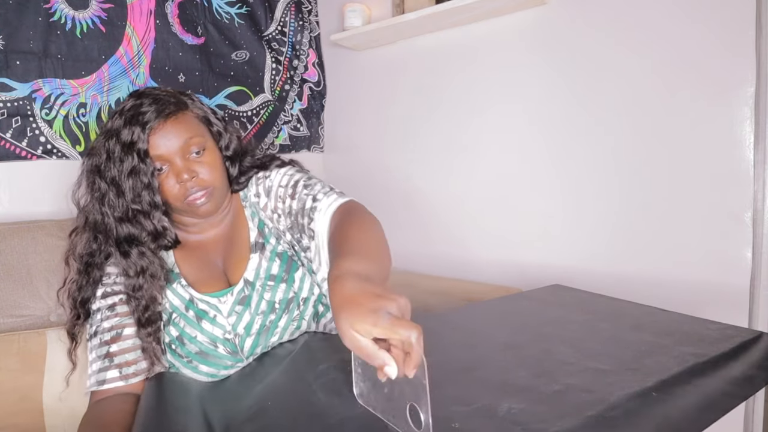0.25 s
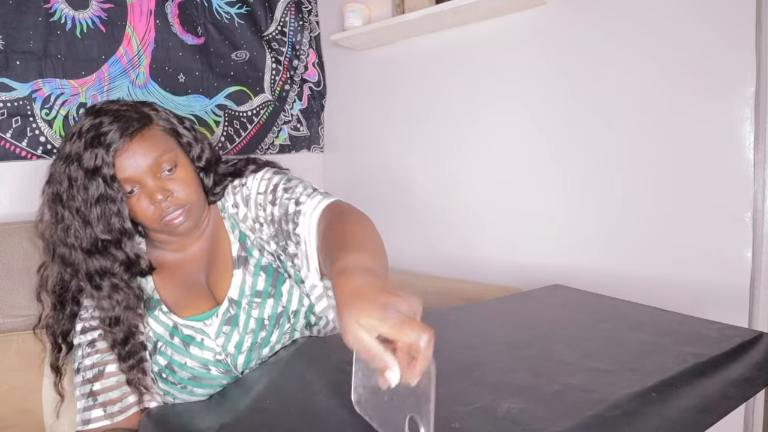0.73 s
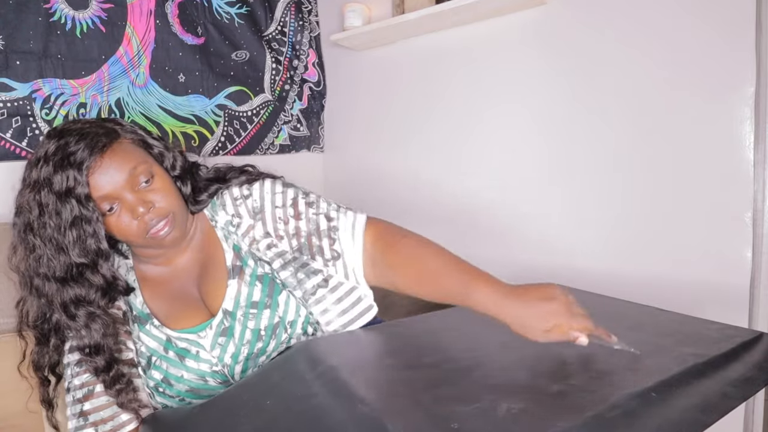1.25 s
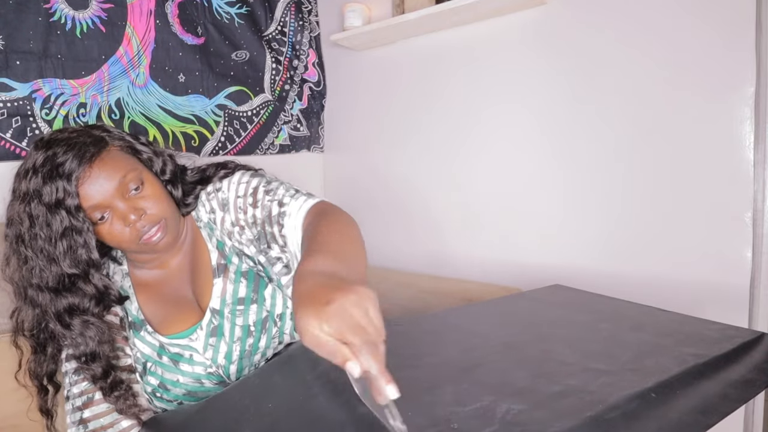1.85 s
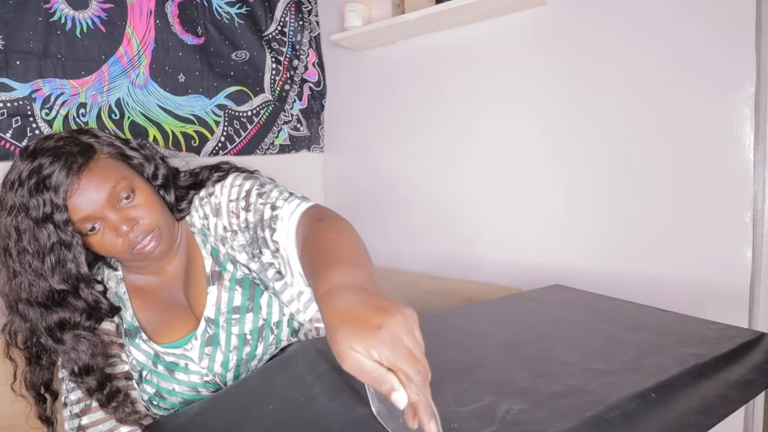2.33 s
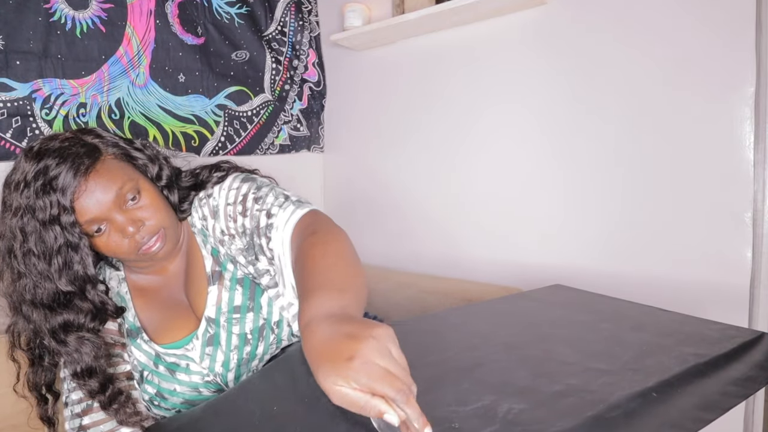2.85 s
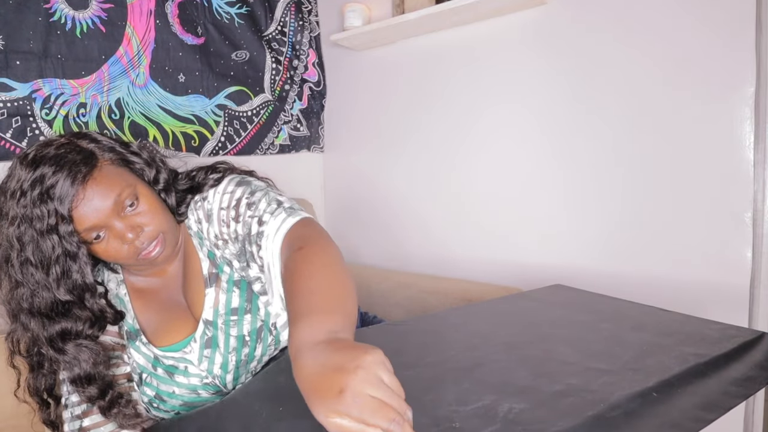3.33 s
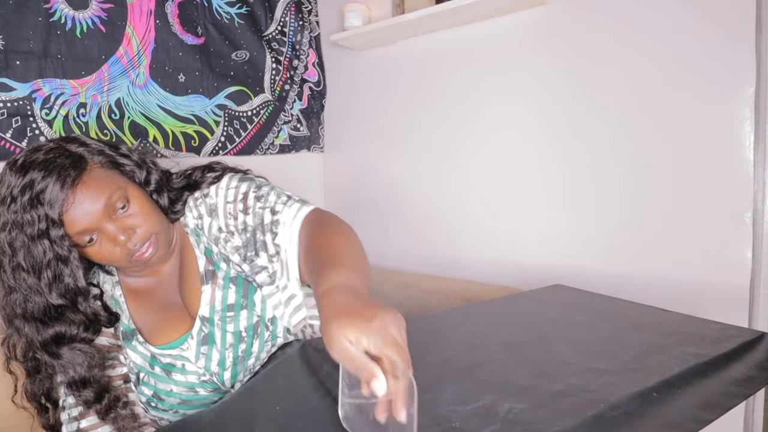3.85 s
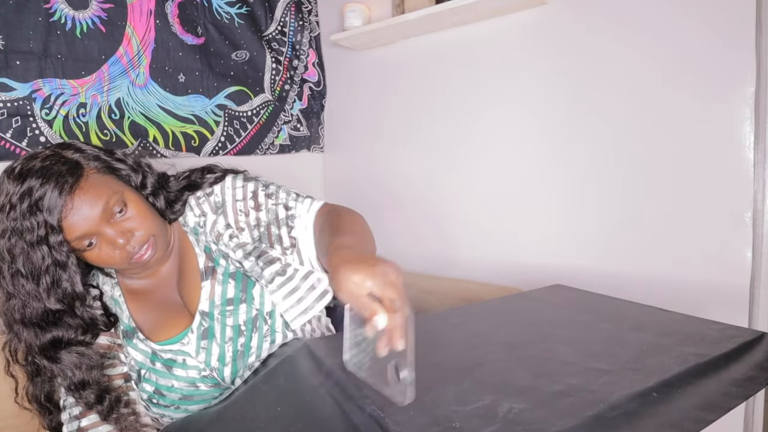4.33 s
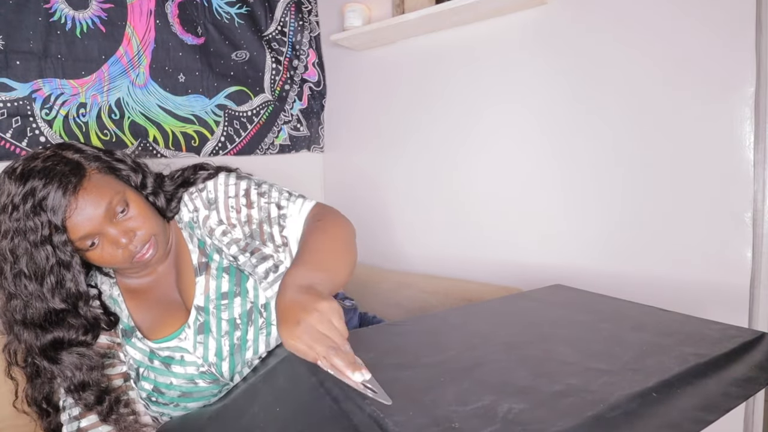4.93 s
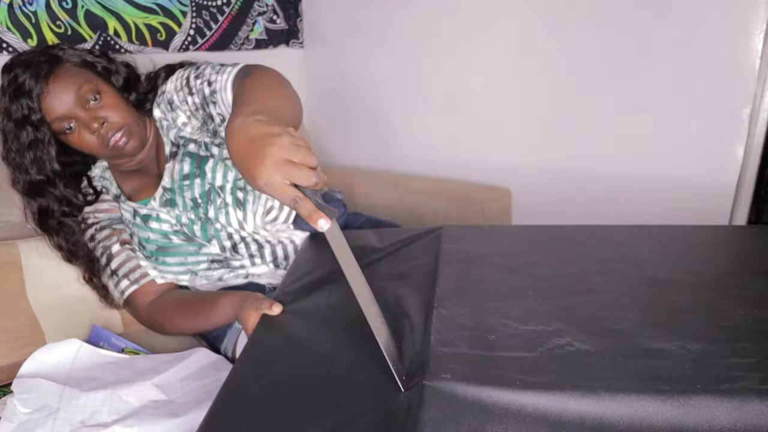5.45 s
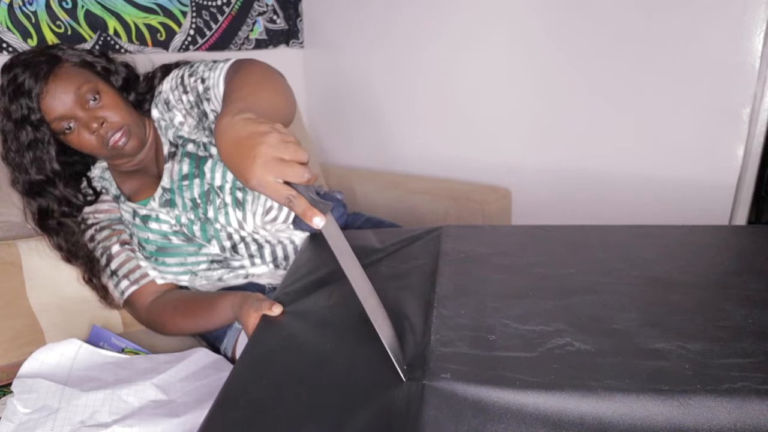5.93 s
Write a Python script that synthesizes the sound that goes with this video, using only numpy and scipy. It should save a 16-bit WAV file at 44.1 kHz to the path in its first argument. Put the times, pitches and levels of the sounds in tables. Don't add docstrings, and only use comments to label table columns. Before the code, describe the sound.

In a small room, a plastic card ticks and rubs lightly over vinyl on a hollow desk. A hard slap starts a long bright scrape, ended by another knock. Several knocks, dull rubs and a quick airy flick follow, then a shorter scrape. An abrupt cut leaves faint rubs and a small closing tick. Close stereo microphone, low room rumble.

```python
import sys
import numpy as np
from scipy import signal
from scipy.fft import rfft, irfft, next_fast_len
from scipy.io import wavfile
from scipy.ndimage import uniform_filter1d

SR = 44100
rng = np.random.default_rng(int(sys.argv[2]) if len(sys.argv) > 2 else 0)


def amplitude_ratio(level_db):
    exponent = np.asarray(level_db, float) / 20
    return 10 ** exponent


def file_out(sig):
    cols = np.atleast_2d(sig).T
    lim = np.clip(cols, -1, 1)
    pcm = np.round(lim * 32767).astype(np.int16)
    wavfile.write(sys.argv[1], SR, pcm)


N = 273401

# (frequency [Hz], level [dB], t60 [s])
RINGS = [(422, -9, 0.14), (637.5, -5.5, 0.16), (798, -8.5, 0.17), (1129, -2, 0.15), (1270.5, 3.5, 0.047),
         (1456, 0.5, 0.053), (1727, 1.5, 0.036), (2060, -8, 0.1), (2270, -41, 0.22), (3070, 7, 0.021)]
RESTART_S = 5.538
CLOCK = np.arange(0, N + 32, 32) / SR


def evened(x):
    return x / np.sqrt(np.mean(x ** 2) + 1e-20)


def read(points, hz):
    f, value = np.transpose(points)
    return np.interp(np.log(hz + 1), np.log(f + 1), value)


def colour(x, gain):
    n = next_fast_len(x.shape[-1] + 4096)
    hz = np.fft.rfftfreq(n, 1 / SR)
    return irfft(rfft(x, n) * gain(hz), n)[..., :x.shape[-1]]


def band(x, lo_hz, hi_hz):
    sos = signal.butter(2, [lo_hz, min(hi_hz, 0.45 * SR)], "band", fs=SR, output="sos")
    return signal.sosfilt(sos, x)


def resonate(x, hz, width):
    turn = np.exp(2j * np.pi * np.cumsum(hz * np.ones(len(x))) / SR)
    r = np.exp(-np.pi * width / SR)
    envelope = signal.lfilter([1 - r], [1, -r], x / turn + 1e-18)
    return 2 * (turn * envelope).real


def diffuse(a, b):
    # (frequency [Hz], likeness [0 to 1])
    likeness = [(100, 0.99), (300, 0.74), (700, 0.46), (1500, 0.029), (3000, 0.51), (6000, 0.29),
                (12000, 0.25)]

    def like(hz):
        return np.clip(read(likeness, hz), 0, 1)

    right = colour(a, like) + colour(b, lambda hz: np.sqrt(1 - like(hz) ** 2))
    return np.array([a, right])


def swell(peak_s, db, rise_s, fall_s):
    late = CLOCK - peak_s
    cut = (peak_s < RESTART_S) & (CLOCK > RESTART_S)
    return amplitude_ratio(db - 20 * np.maximum(-late / abs(rise_s), late / abs(fall_s))) * ~cut


def smooth(gesture):
    return np.interp(np.arange(N) / SR, CLOCK, gesture)


def air():
    # (frequency [Hz], level [dB per Hz])
    spectrum = [(24, -48), (40, -6.5), (58, -12.5), (74, -10.5), (108, -12.5), (142, -14), (182, -20),
                (346, -16), (392, -22), (2010, -32.5), (15000, -67.5)]
    a, b = colour(rng.standard_normal((2, N)), lambda hz: amplitude_ratio(read(spectrum, hz)))
    return amplitude_ratio(-59.5) * evened(diffuse(a, b))


def panels():
    # (frequency [Hz], waver [Hz])
    modes = [(118, 8.06), (184, 1.98), (241, 4.64), (388, 3.72)]
    # (time [s], level [dB])
    shakes = [(.26, -58.5), (.74, -49.5), (1.29, -52.5), (1.91, -50.5), (2.16, -63), (2.5, -56),
              (3.95, -56), (4.25, -57), (4.7, -61), (5.34, -55), (5.51, -46.5)]
    # (time [s], level [dB])
    box_swells = [
        (.27, -49.5),
        (1.36, -57),
        (1.93, -40),
        (2.19, -40),
        (2.31, -42.5),
        (3.43, -47.5),
        (3.94, -56),
        (4.295, -41),
        (4.73, -42),
        (5.35, -46),
    ]
    # (peak [s], level [dB], rise [s per 20 dB], fall [s per 20 dB])
    leans = [
        [(.12, -62, 1, 1), (.47, -64, 0.5, -2), (.85, -56.5, -0.2, 0.5), (2.35, -61, .5, .5),
         (5.3, -56.5, 0.36, 4)],
        [(.47, -61, 0.8, .12), (.87, -54.5, 0.5, 0.5), (1.81, -56, .55, 0.3), (2.92, -58, 0, .5),
         (5.08, -47.5, 0.1, 0.24)],
        [(0.0, -49, .1, .3), (.31, -58, 1.5, 0.6), (1.36, -56, .35, 0.05), (3.99, -55.5, 0.3, -0.1),
         (5.3, -56.5, .45, -0.1), (5.77, -65, 0.6, 1)],
        [(.4, -60.5, 0.5, .5), (.9, -63, 1, .9), (2.7, -64, -2.5, 2.7), (5.1, -59.5, -0.7, 2),
         (5.77, -64.5, -1.2, .5)],
    ]
    jolts = sum(swell(s, db, 0.071, 0.08) for s, db in shakes)
    booms = sum(swell(s, db, 0.056, 0.074) for s, db in box_swells)
    struck = [amplitude_ratio(share_db) * jolts for share_db in (1.5, -3.5, -3)] + [booms]
    drift = uniform_filter1d(rng.standard_normal((len(modes), N)), 1500, axis=1)
    hum = np.zeros(N)
    for (hz, waver_hz), hit, rows, d in zip(modes, struck, leans, drift):
        strength = np.max([hit] + [swell(*row) for row in rows], axis=0)
        phase = 2 * np.pi * np.cumsum(hz + waver_hz * evened(d)) / SR
        hum += amplitude_ratio(2.5) * smooth(strength) * np.sin(phase)
    return hum


def hand():
    # (peak [s], force [dB], rise [s per 20 dB], fall [s per 20 dB], treble [dB])
    rubs = [(0.235, -46.5, 0.07, 0.2, 1.5), (0.45, -52.5, 0.3, 0.28, 0.5), (0.63, -55, 0.3, 0.5, -12),
            (0.727, -35.5, 0.0331, 0.09, -3.5), (0.984, -42, 0.06, 0.04, -2), (1.19, -41, 0.04, 0.05, -7),
            (1.89, -25.5, 0.05, 0.0626, -5.5), (2.268, -47, 0.03, 0.08, -0.5),
            (2.499, -49.5, .03, 0.12, -4), (2.634, -49, .07, 0.07, 1.5), (3.084, -57.5, 0.55, .06, -3.5),
            (3.202, -51.5, 0.08, .5, -10), (3.43, -41, 0.1861, 0.2, -2.5), (3.574, -51.5, 0.07, 0.05, -4),
            (3.845, -39.5, 0.17, .06, -5.5), (3.938, -53, 0.5, 0.16, -9.5), (4.44, -62, 0.81, -0.24, -7),
            (5.12, -42.5, 0.08, 0.23, -2.5), (5.3, -37, 0.08, 0.03, -0.5), (5.52, -59.5, 0.3, .06, 2.5),
            (5.78, -58.5, 0.07, 0.3, 0), (5.972, -58, 0.14, .13, 0), (6.076, -49.5, -0.04, -0.06, -3),
            (6.12, -57, 0, 0, 0)]
    # (peak [s], force [dB], rise [s per 20 dB], fall [s per 20 dB])
    drags = [(0.82, -50.5, 0.48, .5), (1.128, -62, .15, -0.5), (2.2, -51.5, 0.02, 0.28),
             (2.29, -53.5, 0, 0.26), (2.77, -60.5, -0.2, 0.5), (4.106, -67, 0.8, -1.5),
             (4.204, -63, -0.3, 0.15), (4.27, -55.5, -0.23, .07), (4.66, -67, -0.3, -3.5),
             (5.4, -59, 0.5, 1.5)]
    # (peak [s], force [dB], rise [s per 20 dB], fall [s per 20 dB])
    rustles = [(.07, -69, -0.2, 0.1), (2.062, -65, 0.2, .15), (2.355, -56.5, 0.07, 0),
               (2.99, -63.5, -0.2, 0.44), (3.33, -55.5, 0.2, 0.07), (3.89, -52.5, 0.14, .06),
               (5.72, -71.5, .1, 1)]
    # (time [s], force [dB], card resonance [Hz])
    pulls = [
        [(1.28, -44, 1600), (1.31, -47, 1480), (1.366, -28, 2600), (1.518, -22.5, 2500), (1.576, -26.5, 2640),
         (1.652, -33, 1440), (1.818, -32, 1650), (1.87, -41.5, 1940), (2.11, -72, 1720)],
        [(4.684, -55, 1680), (4.716, -39, 1330), (4.79, -30.5, 1600), (4.86, -31, 1600), (4.954, -39.5, 1410),
         (5.046, -76, 1530)],
    ]
    rest_db = -84.5
    pull_treble_db, pull_dull_db, speed_up_s = -6.5, -23, 0.11
    treble_steepness = 0.51
    load_db, load_slope = 3, -0.47
    lift_db, lift_slope = -38, -3.0

    t = CLOCK
    card_hz = np.full(len(t), 1600.0)
    moves = [(swell(*row[:4]), row[1], row[4]) for row in rubs]
    moves += [(swell(*row), row[1], -32) for row in drags]
    moves += [(swell(*row), row[1], 5) for row in rustles]
    for s, db, hz in map(np.transpose, pulls):
        on = (t >= s[0]) & (t < s[-1])
        force_db = np.interp(t, s, db)
        slowness = np.clip(1 - (t - s[0]) / speed_up_s, 0, 1)
        moves.append((on * amplitude_ratio(force_db), force_db, pull_treble_db + pull_dull_db * slowness))
        card_hz = np.where(on, np.interp(t, s, hz), card_hz)

    force = amplitude_ratio(rest_db) + np.max([gain for gain, _, _ in moves], axis=0)
    treble = np.max([gain * amplitude_ratio(treble_db) * (gain / amplitude_ratio(top_db)) ** treble_steepness
                     for gain, top_db, treble_db in moves], axis=0)
    loads = []
    for gain, db, _ in moves:
        lift = lift_slope * np.maximum(db - lift_db, 0)
        loads.append(gain * amplitude_ratio(load_db + load_slope * (db + 55.5) + lift))
    return map(smooth, (force, treble, np.max(loads, axis=0), card_hz))


def scrape(slips_per_s=9000, card_db=-4, card_width=350, bend_db=-3, ring_db=-9):
    # (frequency [Hz], level [dB per Hz])
    sheet_spectrum = [(150, -8), (700, -16), (1300, 1), (2500, 9), (4000, 1), (6000, -8.5), (9000, -12),
                      (12500, -14), (15500, -36)]
    # (frequency [Hz], width [Hz], level [dB])
    bends = [(1400, 250, 0), (2800, 500, 2), (4000, 500, -1), (5800, 600, -7)]
    force, bright, load, card_hz = hand()

    sizes = amplitude_ratio(2.8 * np.minimum(rng.exponential(1, (3, N)), 5)) * rng.choice([-1.0, 1.0], (3, N))
    slips = evened(sizes * (rng.random((3, N)) < slips_per_s / SR))
    slips = slips + 0.8 * rng.standard_normal((3, N))
    slips = slips * amplitude_ratio(0.9 * evened(uniform_filter1d(rng.standard_normal(N), 300)))

    sheet = colour(slips[:2], lambda hz: amplitude_ratio(read(sheet_spectrum, hz)))
    body = evened(band(sheet[0], 620, 5040))
    moving = resonate(slips[0], card_hz, card_width)
    bending = sum(amplitude_ratio(db) * resonate(slips[0], hz, width) for hz, width, db in bends)
    ringing = sum(amplitude_ratio(db) * resonate(slips[0], hz, 34) for hz, db, _ in RINGS[2:9])
    body = body + amplitude_ratio(card_db) * evened(moving)
    body = body + amplitude_ratio(bend_db) * evened(bending) + amplitude_ratio(ring_db) * evened(ringing)
    body = evened(body)
    treble = evened(band(sheet[1] + 0.6 * sheet[0], 4500, 17000))
    desk = evened(band(slips[2], 176, 940))
    desk = evened(desk + amplitude_ratio(-9.5) * evened(resonate(slips[2], 586, 70)))
    return amplitude_ratio(-5) * (force * body + bright * treble + load * desk)


def taps(length=9000, crack_t60=0.04, ring_db=-13):
    # (time [s], peak [dB], crack centre [Hz], desk thud [dB], ring t60 [s])
    knocks = [(0.531, -36.5, 1320, -26, 0.084), (1.128, -38, 1590, -21, .12),
              (1.274, -19.5, 1730, -10.5, 0.17), (1.284, -6.5, 1550, -18, 0.07),
              (1.885, -12.5, 2150, -15.5, 0.13), (2.15, -15.5, 1600, -13.5, .11),
              (2.209, -30, 1010, -8, 0.1), (2.265, -28.5, 1670, -3, .16), (2.281, -26.5, 1040, -12.5, 0.11),
              (2.466, -41.5, 1880, -25, 0.087), (3.747, -37, 895, -14, .19), (3.955, -34.5, 1080, -18, 0.1),
              (4.102, -38.5, 1800, -25, .11), (4.247, -22, 1100, -8.5, 0.13), (4.684, -19, 1850, -7, 0.084),
              (4.706, -27, 1240, -9, 0.14), (5.316, -26.5, 2120, -13, 0.12), (5.474, -49, 627, -2, 0.14),
              (5.499, -34, 890, -9, 0.059), (5.53, -60, 880, -7, 0.11), (6.063, -40, 590, -10, 0.17)]
    # (time [s], peak [dB], crack centre [Hz], desk thud [dB], treble tick [dB])
    ticks = [(0.053, -40, 1940, -19, -10.5), (0.173, -46, 1000, -2, -11), (0.23, -29, 875, -3, -8.5),
             (0.621, -30, 2060, -14, -4.5), (0.631, -41, 1500, -15, -6), (0.718, -29.5, 650, -23, -17),
             (0.883, -22.5, 2470, -32, -10), (0.931, -26, 2500, -13, -24), (0.977, -35, 2020, -17.5, -15),
             (1.117, -38.5, 1690, -12, -24), (1.188, -27, 2540, -16.5, -15), (2.133, -37.5, 1150, -36, -14),
             (2.485, -41, 784, 1.5, -6), (3.564, -23, 2420, -31, -16), (3.678, -35.5, 1500, -15, -13),
             (3.966, -36, 714, -12, -12), (6.076, -20.5, 2370, -47, -4)]
    rows = [(*row[:4], -24.5, row[4], 0) for row in knocks]
    rows += [(*row, 0.071, -5) for row in ticks]
    t = np.arange(length) / SR
    out = np.zeros(N + length)
    noise = rng.standard_normal((len(rows), length))
    chance = rng.random((len(rows), len(RINGS), 2))
    for (s, db, hz, thud_db, tick_db, t60, dry_db), puff, draw in zip(rows, noise, chance):
        snap = 2.0 * (0.1 / abs(t60)) ** 3 * np.exp(-((t - 0.0003) / 0.00004) ** 2)
        blow = snap + puff * amplitude_ratio(-60 * t / crack_t60)
        crack = band(band(blow, 0.41 * hz, 2.04 * hz), 0.31 * hz, 2.07 * hz)
        tick = band(3.0 * snap + puff * amplitude_ratio(-60 * t / 0.01), 3000, 12500)
        thud = band(puff * amplitude_ratio(-60 * t / 0.026), 259, 518)
        parts = (1, crack), (amplitude_ratio(tick_db + 10.5), tick), (amplitude_ratio(thud_db), thud)
        sound = sum(gain * part / abs(part).max() for gain, part in parts)
        for (ring_hz, mode_db, mode_t60), (a, b) in zip(RINGS, draw):
            struck_db = thud_db + 9 if ring_hz < 700 else -10 * abs(np.log2(ring_hz / hz))
            decay = amplitude_ratio(-60 * t / (mode_t60 * abs(t60) / 0.13 + 1e-3)) * (1 - np.exp(-t / 0.004))
            level = amplitude_ratio(ring_db + dry_db + mode_db + struck_db + 8 * a)
            sound = sound + level * decay * np.sin(2 * np.pi * (ring_hz * t + b))
        at = round(s * SR)
        out[at:at + length] += amplitude_ratio(db) * sound
    return out[:N]


def reflections(first=130):
    # (frequency [Hz], t60 [s])
    decay_times = [(150, 0.21), (500, 0.21), (2000, 0.24), (6000, 0.11), (14000, 0.21)]
    sparse = np.zeros((2, SR // 2))
    slots = np.arange(first, SR // 2 - 20, 20)
    at = slots + rng.integers(0, 20, (2, len(slots)))
    np.put_along_axis(sparse, at, rng.choice([-1.0, 1.0], (2, len(slots))), 1)
    hz, t, z = signal.stft(sparse, SR, nperseg=256)
    decay = amplitude_ratio(-60 * t / read(decay_times, hz)[:, None])
    tail = signal.istft(z * decay, SR, nperseg=256)[1]
    return tail / np.linalg.norm(tail[0])


def room(x, count=4, turns_per_s=3.0):
    t = np.arange(N) / SR
    before = t < RESTART_S
    wet = np.zeros((2, N))
    for k in range(count):
        turn = (t * turns_per_s - k / count) % 1 * count
        share = np.sin(np.pi * np.clip(turn, 0, 2) / 2)
        sent = np.array([[x * share * before], [x * share * ~before]])
        parts = signal.oaconvolve(sent, reflections()[None], axes=2)[:, :, :N]
        wet += parts[0] * before + parts[1]
    return diffuse(*wet)


def swish(width=600):
    # (time [s], level [dB], resonance [Hz])
    flick = [
        (3.321, -73.5, 5230),
        (3.37, -48, 4740),
        (3.405, -41, 2830),
        (3.435, -42, 1760),
        (3.48, -49.5, 1500),
        (3.522, -58, 1400),
    ]
    s, db, hz = np.transpose(flick)
    t = np.arange(N) / SR
    hiss = resonate(rng.standard_normal(N), np.interp(t, s, hz), width)
    return amplitude_ratio(np.interp(t, s, db, left=-120, right=-120)) * evened(hiss)


def scene():
    # (frequency [Hz], level [dB])
    absorption = [(500, 0), (2000, -.5), (4500, -3.5), (9000, -6), (14000, -7)]
    rub, hits = scrape() + swish(), taps()
    sent = colour(amplitude_ratio(-0.05) * rub + amplitude_ratio(-2.5) * hits, lambda hz: amplitude_ratio(read(absorption, hz)))
    return rub + hits + room(sent) + panels() + air()


def band_limit(x):
    return signal.sosfilt(signal.butter(12, 15730, fs=SR, output="sos"), x)


def record(dry):
    # (frequency [Hz], level [dB])
    port_colour = [(400, -1.5), (1400, 2), (2800, 4), (5600, 10.5), (12000, 5)]
    # (frequency [Hz], level [dB])
    lean = [(60, -1), (240, 0), (950, -0.5), (3770, -3), (15000, -0.5)]
    # (frequency [Hz], phase [rad])
    lead = [(100, 0), (500, -.25), (1000, -.6), (1600, -1.0), (2300, -1.6), (3600, -2.3), (5000, -2.55),
            (8000, -2.65), (15000, -2.5)]
    side = np.array([[0.5], [-0.5]])

    def response(hz):
        level = amplitude_ratio(read(port_colour, hz) + side * read(lean, hz))
        return level * np.exp(1j * side * read(lead, hz))

    return band_limit(colour(dry, response))


dry = scene()
out = record(dry)
file_out(out)
```